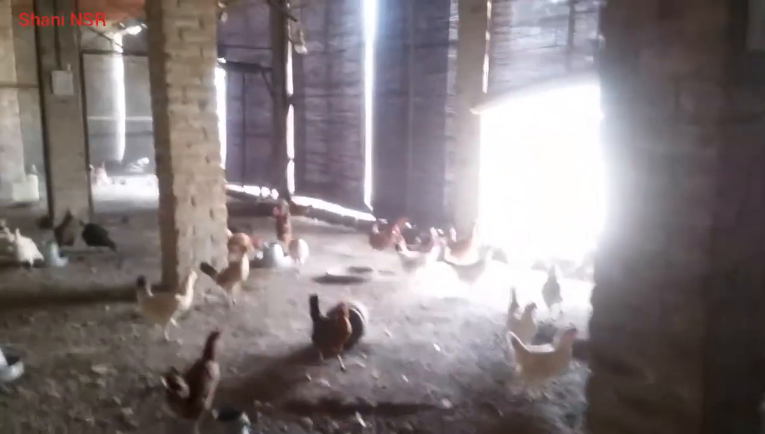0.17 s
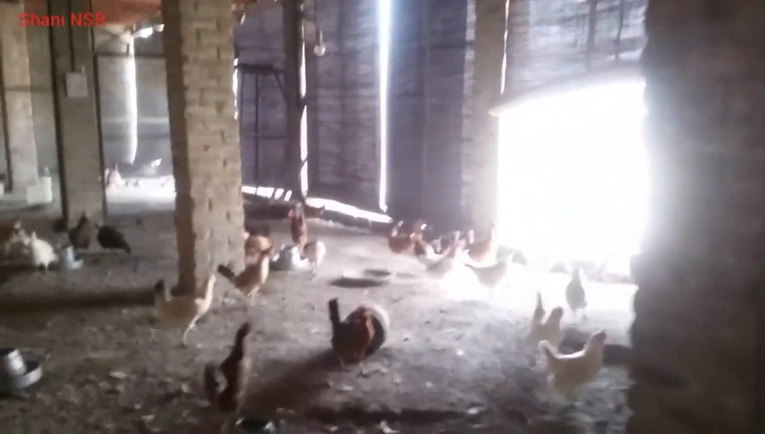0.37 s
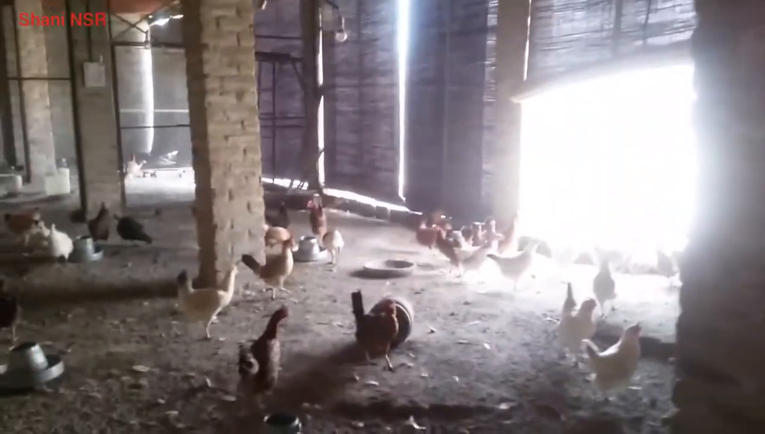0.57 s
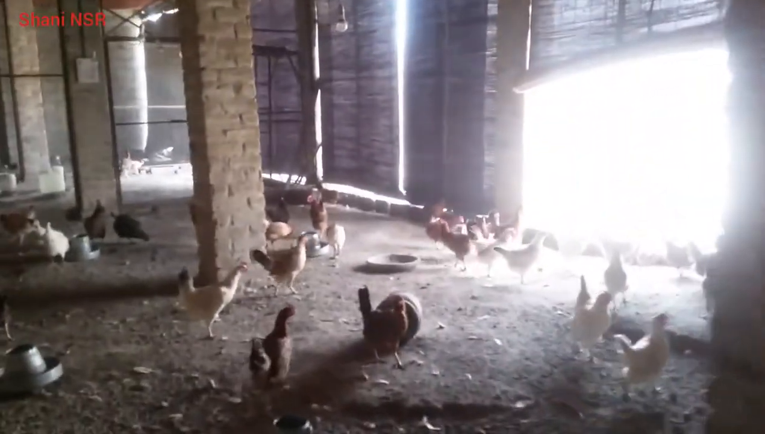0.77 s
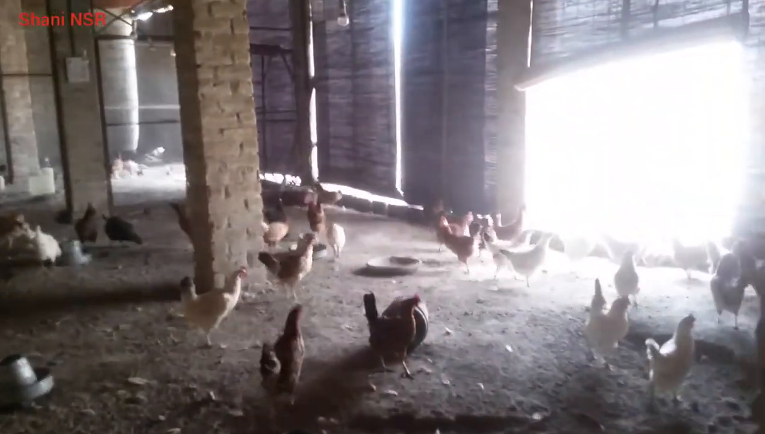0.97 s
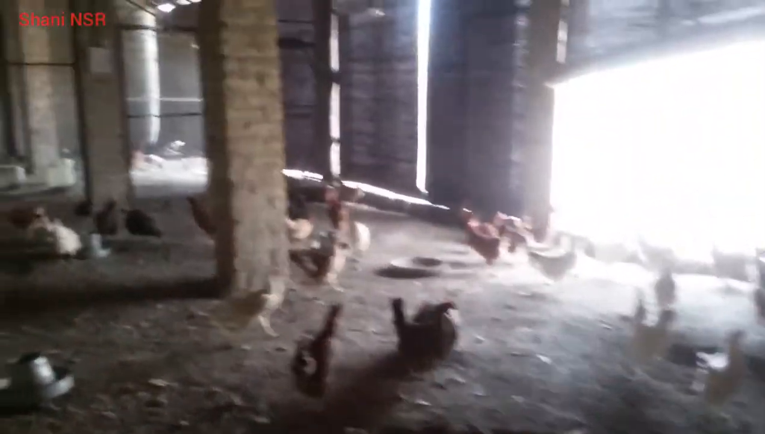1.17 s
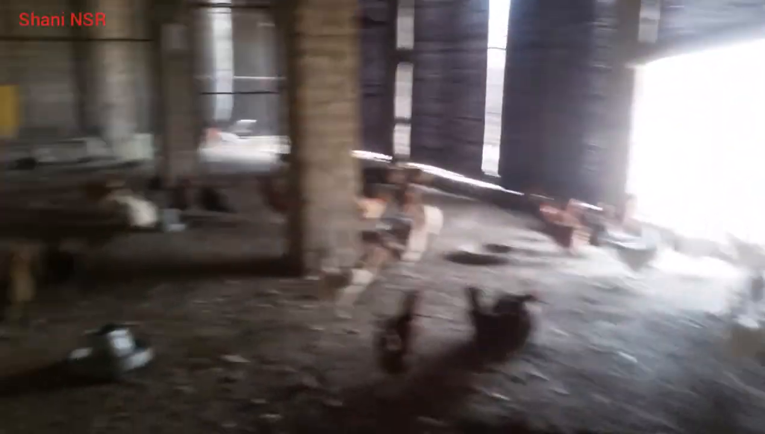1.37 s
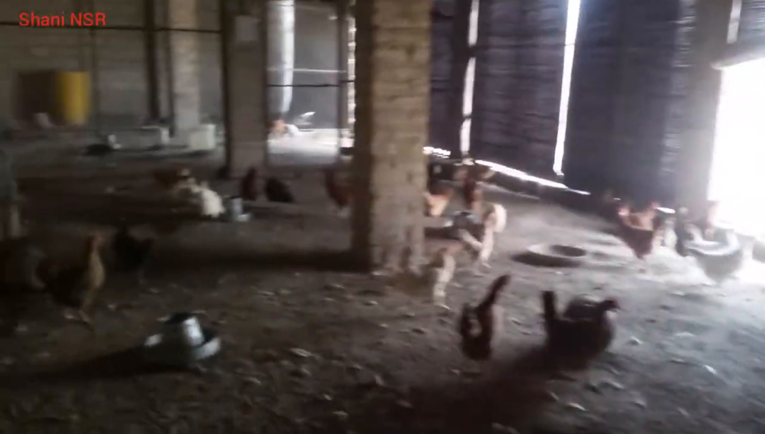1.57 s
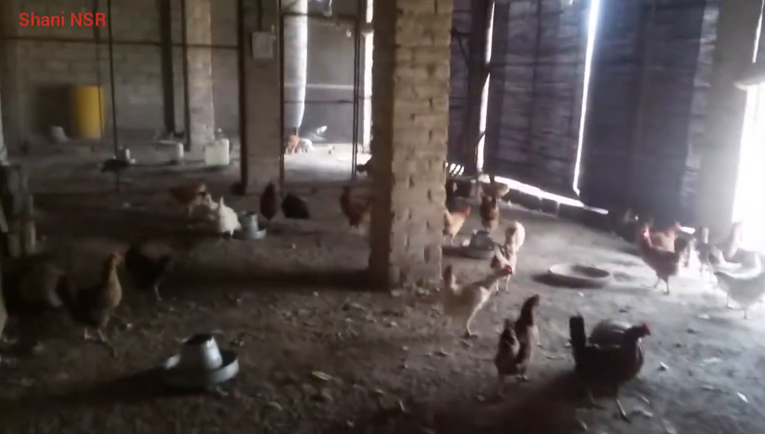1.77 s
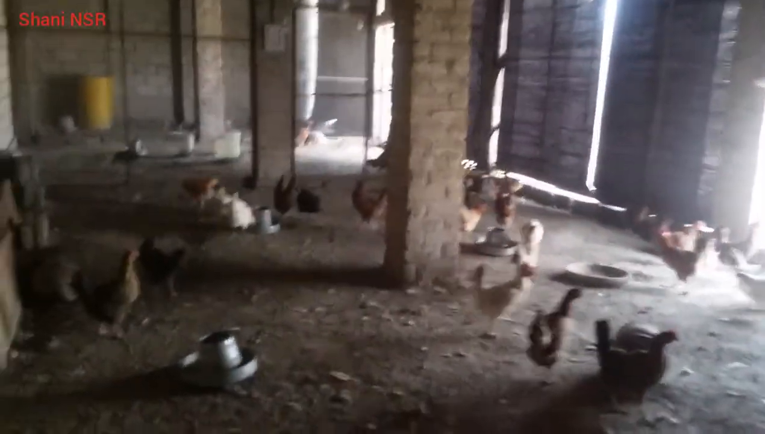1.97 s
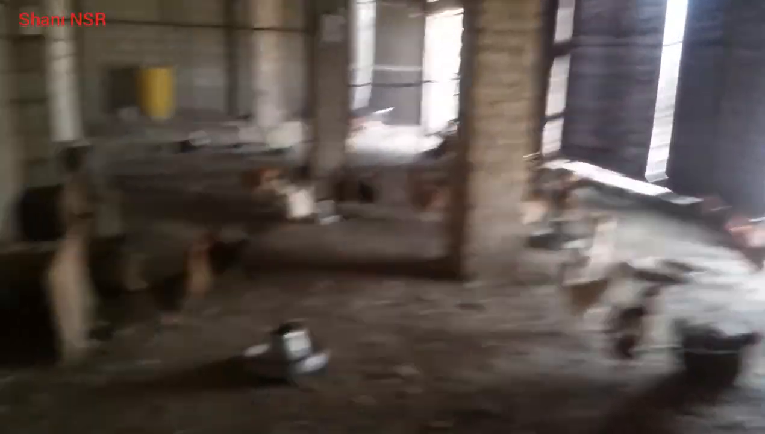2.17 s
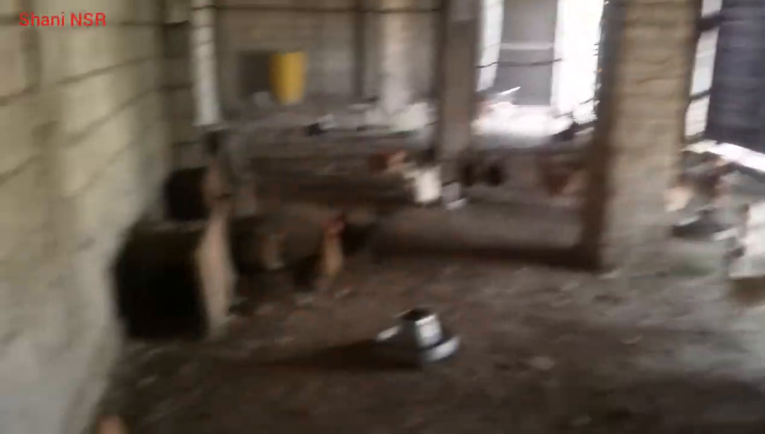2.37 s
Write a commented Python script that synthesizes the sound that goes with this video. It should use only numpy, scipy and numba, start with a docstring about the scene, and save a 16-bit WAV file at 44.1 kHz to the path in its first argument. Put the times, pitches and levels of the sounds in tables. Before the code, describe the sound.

Hens give a bunch of short clucks over drawn-out moans in a ringing brick shed. Faint scratching, pecking and distant cheeping follow, then a near bird squawks hoarsely twice while soft knocks bump the microphone.

```python
"""Hens in a brick poultry shed, over low noise and a faint hum. First a bunch of short clucks sounds
over the drawn-out moans of others, each voice a shaking syrinx filtered by the throat. From 0.9 s feet
scratch, beaks peck and the far flock's cheeping swells. At 2 s a near bird lets out two loud, hoarse
squawks, while soft knocks bump the right microphone. The shed rings after every call."""
import sys
import numpy as np
from scipy import signal
from scipy.fft import rfft, irfft, next_fast_len
from scipy.io import wavfile
from numba import njit

SR = 44100
rng = np.random.default_rng(int(sys.argv[2]) if len(sys.argv) > 2 else 0)


def bounce(signal):
    """Save signal as a 16-bit WAV file at the path given by the first command-line argument."""
    frames = np.transpose(np.atleast_2d(signal))
    limited = np.clip(frames, -1, 1)
    pcm = np.round(limited * 32767).astype(np.int16)
    wavfile.write(sys.argv[1], SR, pcm)


N = 107207
T = np.arange(N) / SR


def undb(db):
    """Decibels to gain."""
    return 10 ** (np.asarray(db) / 20)


def unit(x):
    """Scale to rms 1."""
    return x / np.sqrt(np.mean(x ** 2) + 1e-18)


def gain_at(hz, colour):
    """Gain of an (f/Hz, level/dB) table at any frequency."""
    f, db = np.array(colour).T
    return undb(np.interp(np.log(np.maximum(hz, 1)), np.log(f), db))


def shape(x, response):
    """Filter by a gain that is a function of frequency."""
    size = next_fast_len(N + N // 4, real=True)
    hz = np.arange(size // 2 + 1) * SR / size
    return irfft(rfft(x, size) * response(hz), size)[..., :N]


def noise(colour):
    """Coloured noise, rms 1."""
    return unit(shape(rng.standard_normal(N), lambda f: gain_at(f, colour)))


def wobble(rate_hz):
    """Smooth random drift, rms 1."""
    return unit(shape(rng.standard_normal(N), lambda f: np.exp(-.5 * (f / rate_hz) ** 2)))


def curves(table):
    """Columns of a control table, interpolated over time."""
    times, *columns = np.array(table).T
    return [np.interp(T, times, column) for column in columns]


def gate(start, end, edge_s):
    """On between two times, with soft edges."""
    return np.clip((T - start) / edge_s + .5, 0, 1) * np.clip((end - T) / edge_s + .5, 0, 1)


def pan(x, db):
    """Place a sound by its left-minus-right level."""
    return x * undb(np.array([[db], [-db]]) / 2)


@njit
def resonate(x, hz, width_hz):
    """Band-pass with a moving centre, gain 1 there."""
    y, band_state, low_state = np.empty(len(x)), 0., 0.
    for i in range(len(x)):
        g, damping = np.tan(np.pi * hz[i] / SR), width_hz / hz[i]
        band = (band_state + g * (x[i] - low_state)) / (1 + g * (g + damping))
        band_state = 2 * band - band_state
        low_state += 2 * g * band
        y[i] = damping * band
    return y


# Left-right likeness of the ring: f/Hz, correlation
RING_CORRELATION = [(300, 0.46), (750, 0.4), (1200, 0.23), (1900, 0.68), (6000, .1)]

def shed(x, low_t60_s=0.62, treble_t60_s=0.38, split_hz=2500, first_echo_s=0.0049, build_s=0.0043):
    """Diffuse ring of the brick walls, shorter in the treble."""
    white = rng.standard_normal((2, N))
    low = shape(white, lambda f: 1 / (1 + (f / split_hz) ** 2))
    tail = low * undb(-60 * T / low_t60_s) + (white - low) * undb(-60 * T / treble_t60_s)
    onset = np.clip((T - first_echo_s) / build_s, 0, 1)
    mid, side = unit(tail * onset) / np.sqrt(N)
    alike = lambda f: np.interp(f, *np.array(RING_CORRELATION).T)
    mid = shape(mid, lambda f: np.sqrt((1 + alike(f)) / 2))
    side = shape(side, lambda f: np.sqrt((1 - alike(f)) / 2))
    return np.array([signal.fftconvolve(x, mid + sign * side)[:N] for sign in (1, -1)])


# Background spectrum: f/Hz, relative level/dB
AIR_COLOUR = [(20, -19), (40, -4.5), (65, 3), (100, -4.5), (200, 0), (330, -7), (650, -14), (870, -10.5),
              (1050, -17), (1700, -17), (3000, -29.5), (5000, -46.5), (8500, -69.5), (11000, -46.5),
              (13000, -34.5), (15500, -29.5)]
# Hum lines: f/Hz, level/dB
HUM_LINES = [(120, -66), (528, -61.5)]

def background(air_db=-50, side_db=-12.5):
    """Low steady noise, thin hiss and a faint hum."""
    air = noise(AIR_COLOUR) + undb(side_db) * noise(AIR_COLOUR) * np.array([[1], [-1]])
    hum = sum(undb(db) * np.sqrt(2) * np.sin(2 * np.pi * hz * T) for hz, db in HUM_LINES)
    return pan(undb(air_db) * air + hum, db=0.5)


# Microphone bumps: t/s, relative level/dB
KNOCKS = [(2.155, -29.5), (2.176, -26.5), (2.203, -31), (2.27, -28.5)]
# Bump filter: f/Hz, gain/dB
KNOCK_COLOUR = [(50, -37), (110, -6), (180, -4), (330, -2.5), (600, 7), (1500, -21)]

def knocks(hz=270, decay_s=0.0018):
    """Dull bumps, each a single push on the right microphone."""
    pushes = 0
    for start, db in KNOCKS:
        age = np.maximum(T - start, 0)
        pushes += undb(db) * np.exp(-age / decay_s) * np.sin(2 * np.pi * hz * age)
    bumps = undb(5.5) * shape(pushes, lambda f: gain_at(f, KNOCK_COLOUR))
    return pan(bumps, db=-16)


# Far flock's swell: t/s, relative level/dB
FLOCK_SWELL = [(0, -62), (.5, -59), (.68, -50), (.85, -58), (.92, -45.5), (1.12, -52.5), (1.22, -45),
               (1.39, -57), (1.46, -49.5), (1.77, -50), (1.9, -50.5), (2.43, -45.5)]
# Rustle spectrum: f/Hz, relative level/dB
RUSTLE_COLOUR = [(800, -24), (1700, -18), (2300, 9.5), (2900, 0.5), (3400, -5.5), (4000, -6.5),
                 (5000, -24.5), (7000, -38)]

def flock(count=120, centre_hz=3010, spread=0.16, width_s=0.0087):
    """Many far birds: short cheeps blurred into a rustle."""
    cheeps = np.zeros(N)
    for when, pitch, strength in rng.random((count, 3)):
        age = T - when * T[-1]
        hz = centre_hz * (1 + spread * (2 * pitch - 1))
        envelope = strength * np.exp(-(age / width_s) ** 2)
        cheeps += envelope * np.sin(2 * np.pi * hz * (age - age ** 2))
    rustle = np.array([noise(RUSTLE_COLOUR) * undb(1.7 * wobble(rate_hz=30)) for _ in range(2)])
    swell = undb(curves(FLOCK_SWELL)[0] - 7)
    return swell * (rustle + undb(-4.5) * unit(shed(cheeps)))


# Far whistles: t/s, length/s, start f/Hz, end f/Hz, level/dB
PEEPS = [(1.166, .08, 3200, 3500, -54.5), (1.274, 0.045, 3435, 3270, -60.5),
         (1.42, 0.081, 3230, 3336, -57.5), (1.51, 0.087, 3250, 3740, -59.5),
         (1.79, 0.091, 3485, 3310, -61.5)]

def peeps(quaver=0.04, direct_db=-8):
    """Thin sliding whistles of far birds, heard mostly through the shed."""
    shake = 1 + quaver * wobble(rate_hz=70)
    whistles = 0
    for start, length, start_hz, end_hz, db in PEEPS:
        hz = np.interp(T, [start, start + length], [start_hz, end_hz]) * shake
        phase = 2 * np.pi * np.cumsum(hz) / SR
        whistles += undb(db) * gate(start, start + length, edge_s=0.02) * np.sin(phase)
    return undb(direct_db) * whistles + shed(whistles)


# Foot strokes: t/s, length/s, level/dB
SCRATCHES = [(0.899, 0.045, -62), (1.6, 0.14, -59.5)]
# Litter spectrum: f/Hz, relative level/dB
LITTER_COLOUR = [(600, -11.5), (1500, -2.5), (2400, 2.5), (3400, -8.5), (4300, -7.5), (5200, -22),
                 (6500, -29.5), (8500, -47)]

def scratches(grain_db=7.5):
    """Feet rake the dry litter in short grainy strokes."""
    strokes = sum(undb(db) * gate(t, t + length, edge_s=0.032) for t, length, db in SCRATCHES)
    return strokes * unit(noise(LITTER_COLOUR) * undb(grain_db * wobble(rate_hz=170)))


# Beak taps: t/s, relative level/dB, resonance f/Hz
PECKS = [(.899, -26.5, 1370), (1.09, -28, 1300), (1.641, -30, 1696), (1.75, -36.5, 2880)]
# Tap filter: f/Hz, gain/dB
PECK_COLOUR = [(100, -8), (500, -3), (4000, -18), (7000, -45.5), (16000, -56.5)]

def pecks(decay_s=0.0011, half_width_hz=810):
    """Taps on the earth floor that die at once, each with its own dull resonance."""
    taps = 0
    for start, db, hz in PECKS:
        burst = rng.standard_normal(N) * undb(db) * (T >= start) * np.exp(-abs(T - start) / decay_s)
        resonance = lambda f: undb(7) / (1 + ((f - hz) / half_width_hz) ** 4)
        taps += shape(burst, lambda f: gain_at(f, PECK_COLOUR) + resonance(f))
    return taps


def voice(hz, gain, rough, throat, clear_hz=SR, jitter=0.035, breakup=0.81):
    """A shaking syrinx heard through the throat; roughness adds half-pitch lines and pulsed hiss."""
    on = gain > 1e-5
    pitch = (hz * (1 + jitter * rough * wobble(rate_hz=59.2)))[on]
    phase = 2 * np.pi * np.cumsum(pitch) / SR
    half_gain = (rough * undb(-2.5) * (1 + 0.17 * wobble(rate_hz=190)))[on]
    # above clear_hz the harmonics break up into hiss
    broken = lambda f: breakup * (1 - 1 / (1 + (f / clear_hz) ** 20))
    tone, power, sound = 0, 0, np.zeros(N)
    for k, offset in enumerate(rng.uniform(0, 2 * np.pi, size=40), 1):
        line_hz = pitch * k / 2
        line_gain = throat(line_hz) * np.sqrt(1 - broken(line_hz)) * (line_hz < 0.45 * SR)
        if k % 2:
            line_gain *= half_gain
        else:
            power += line_gain ** 2 / 2
        tone += line_gain * np.sin(k * phase / 2 + offset)
    sound[on] = tone / np.sqrt(power)
    puffs = rng.standard_normal(N)
    puffs[on] *= 1 + np.cos(phase)
    hiss = unit(shape(puffs, lambda f: throat(f) * f ** 2 / (f ** 2 + 200 ** 2)))
    sound += rough * undb(-3.5) * hiss
    if clear_hz < SR:
        sound += undb(-5) * shape(hiss, lambda f: np.sqrt(broken(f)))
    return sound * gain * undb(3.4 * rough * wobble(rate_hz=69))


# Croon contour: t/s, f/Hz, level/dB
CROON = [(0.25, 335, -58.5), (0.618, 339.3, -50.5), (0.798, 368.3, -50), (0.883, 375.6, -46),
         (0.911, 430, -49), (1.002, 444.1, -49.5), (1.05, 409, -66), (1.113, 398, -45), (1.19, 398.6, -51),
         (1.268, 399, -49.5), (1.346, 414.3, -47.5), (1.37, 382, -69)]
# Throat filter: f/Hz, gain/dB
CROON_THROAT = [(200, -23), (400, 12.5), (800, -24), (1200, -17.5), (2000, -9), (5000, -48)]

def croon(quaver=0.018):
    """One hen holds a soft, wavering note."""
    hz, db = curves(CROON)
    hz *= 1 + quaver * wobble(rate_hz=33)
    gain = undb(db) * gate(CROON[0][0], CROON[-1][0], edge_s=0.019)
    return voice(hz, gain, rough=0.65, throat=lambda f: gain_at(f, CROON_THROAT))


# Moans: t/s, length/s, start f/Hz, end f/Hz, level/dB, throat resonance f/Hz, roughness/0-1
MOANS = [(0.029, 0.047, 351.5, 356, -51, 1000, 0.6), (0.079, 0.13, 430, 441, -51, 1280, 0.5),
         (0.188, 0.14, 406, 420, -52, 801, 1), (0.275, 0.35, 328.7, 357.5, -45.5, 1022, 0.5),
         (0.426, 0.056, 402.3, 396.6, -43.5, 830, 0.1), (0.571, .14, 344, 342.4, -41.5, 973, 0.6),
         (0.732, 0.12, 354, 360.7, -43.5, 1015, 0.59), (0.887, 0.022, 296.7, 294, -39.5, 595, 0.4),
         (0.908, 0.094, 395, 398.3, -38.5, 870, 0.24), (1.019, 0.049, 397.2, 392.7, -36.5, 867, 0.15),
         (1.057, 0.06, 373, 366.7, -40.5, 1010, 0.6), (1.262, 0.044, 398.5, 396, -50, 1270, 0.35),
         (1.795, 0.08, 430, 441, -62.5, 878, 0.7)]
# Throat filter under the resonance: f/Hz, gain/dB
MOAN_THROAT = [(200, -24), (450, -38.5), (1250, -23), (1650, -11.5), (1900, -25), (2300, -34),
               (4000, -45.5), (7000, -65.5)]

def moans(quaver=0.018, throb_db=2.5, width_hz=184):
    """Low quavering notes; one throat resonance picks out a harmonic."""
    notes = 0
    for start, length, start_hz, end_hz, db, throat_hz, rough in MOANS:
        throat = lambda f: gain_at(f, MOAN_THROAT) + 1 / (1 + ((f - throat_hz) / width_hz) ** 2) ** 2
        hz = np.interp(T, [start, start + length], [start_hz, end_hz])
        hz *= 1 + quaver * wobble(rate_hz=33.4)
        gain = undb(db + throb_db * wobble(rate_hz=11)) * gate(start, start + length, edge_s=0.019)
        notes += voice(hz, gain, rough, throat)
    return notes


# Clucks, the second heard as several quick pulses:
# peak t/s, rise/s, fall/s, f/Hz, level/dB, pan/dB, roughness/0-1
CLUCKS = [(.16, 0.012, 0.018, 588.7, -28, 0.5, 0.12), (.322, 0.004, 0.015, 650.6, -25, -1.5, 0.19),
          (.338, 0.0032, .004, 646, -26, -4, 0.2), (.351, .004, .007, 640, -28, -0.5, 0.08),
          (.377, 0.0065, 0.007, 651, -35, 0, 0), (.482, .012, 0.008, 749, -23.5, -1, 0.07),
          (.555, 0.0092, 0.008, 746, -23, -2, 0.04), (.658, 0.019, 0.008, 740.4, -27.5, -0.5, 0.1)]
# Throat filter: f/Hz, gain/dB
CLUCK_THROAT = [(400, -18), (600, -7.5), (760, -4), (1170, 3), (1480, 12), (1620, -7.5), (1760, -10),
                (1920, -6.5), (2150, -22.5), (3000, -38), (4400, -48), (7000, -70.5)]

def clucks(arch=0.033, quaver=0.023):
    """Short notes whose pitch arches with their strength."""
    notes = 0
    for peak, rise, fall, hz, db, pan_db, rough in CLUCKS:
        swell = np.exp(-((T - peak) / np.where(T < peak, rise, fall)) ** 2)
        bend = 1 - arch * (1 - swell) + quaver * wobble(rate_hz=36)
        note = voice(hz * bend, undb(db) * swell, rough, lambda f: gain_at(f, CLUCK_THROAT))
        notes += pan(note, pan_db)
    return notes


# Squawk contours: t/s, f/Hz, relative level/dB, roughness/0-1, beak resonance f/Hz, treble/dB
FIRST_SQUAWK = [(1.985, 660, -45, 0.07, 1970, -18.5), (1.995, 659.6, -13, 0.25, 1986, -22),
                (2.002, 674, -20.5, 0.3, 1890, -19), (2.007, 696.5, -15.5, 0.2, 1420, -17),
                (2.02, 708.5, -13, 0.2, 1495, -14), (2.03, 736, -23.5, 0.19, 1300, -5.5),
                (2.055, 760, -16.5, 0.3, 1418, -8), (2.075, 781.9, -16.5, 0.48, 1564, -2.5),
                (2.095, 757.3, -17.5, 0.74, 1240, -13), (2.11, 688.4, -16, 0.7, 1313, -5),
                (2.126, 675, -13, 0.38, 1353, -11), (2.14, 673.5, -30.5, 0.4, 1320, 9),
                (2.17, 652, -31.5, 0.8, 699, 5), (2.2, 670, -49, 0.7, 751, 2)]
SECOND_SQUAWK = [(2.28, 535.4, -58, 0.43, 1060, -14), (2.3, 603.8, -19, 0.33, 1044, -16.5),
                 (2.315, 645, -16, 0.92, 1920, -8), (2.328, 805, -14.5, 0.4, 1880, -8.5),
                 (2.342, 803, -15.5, 0.24, 1940, 6.5), (2.375, 811.6, -22, 0.21, 1550, 11.5),
                 (2.41, 794, -21, 0.36, 1452, -7), (2.44, 802, -33.5, 0.36, 1530, -12)]
# Throat filters, beak wider in the second: f/Hz, gain/dB
FIRST_THROAT = [(300, -38.5), (460, -5.5), (600, -1), (740, -1.5), (900, -3.5), (1050, -1), (1170, -7.5),
                (1380, 3.5), (1550, -13.5), (1720, -7.5), (1980, -7), (2400, -27), (2650, -28.5),
                (2870, -13.5), (3100, -23.5), (3500, -31), (4100, -25.5), (5000, -33.5), (6800, -41.5),
                (8000, -62.5), (9600, -48.5), (13500, -44.5), (16000, -55)]
SECOND_THROAT = [(300, -32), (460, -22.5), (600, 2.5), (790, 3), (910, 2), (1060, 5.5), (1180, -5),
                 (1570, 0.5), (1760, -5), (1960, 2), (2400, -17.5), (2850, -15), (3200, -23), (4050, -22),
                 (4850, -17.5), (5600, -44), (6500, -41.5), (8500, -68.5), (10300, -46.5), (12000, -62),
                 (14300, -39), (16000, -75)]

def squawk(contour, throat, clear_hz, beak_db=9.5, treble_hz=3600):
    """A loud cry that rises in pitch and breaks up; the beak sweeps a resonance and lets out treble."""
    hz, db, rough, beak_hz, treble_db = curves(contour)
    gain = undb(db) * gate(contour[0][0], contour[-1][0], edge_s=0.004027)
    cry = voice(hz, gain, rough, lambda f: gain_at(f, throat), clear_hz)
    beak = resonate(cry, beak_hz, width_hz=240.)
    cry = (cry + (undb(beak_db) - 1) * beak) / undb(beak_db / 2)
    treble = shape(cry, lambda f: 1 - 1 / (1 + (f / treble_hz) ** 10))
    return pan(cry + (undb(treble_db) - 1) * treble, db=4)


def scene():
    """Every bird is heard directly and through the shed."""
    squawks = squawk(FIRST_SQUAWK, FIRST_THROAT, clear_hz=3530)
    squawks += squawk(SECOND_SQUAWK, SECOND_THROAT, clear_hz=15140)
    clucking = clucks()
    murmur = pan(moans() + croon(), db=3.5) + pecks() + scratches()
    send = undb(-7) * murmur + undb(-9) * clucking + undb(-1) * squawks
    hens = murmur + clucking + squawks + shed(send.mean(axis=0))
    return background() + knocks() + flock() + peeps() + undb(-0.14) * hens


# Microphone balance: f/Hz, left minus right/dB
MIC_BALANCE = [(100, -1.5), (300, -3), (700, -3), (1400, -3), (2700, -7.5), (4500, -4.5), (8000, -4),
               (14000, 10.5)]
# Right microphone's lead: f/Hz, phase/rad
MIC_PHASE = [(60, 0), (400, -.3), (750, 0), (1100, .5), (1400, 2.1), (1900, 1.8), (3000, 1.2), (6000, .8)]

def record(dry):
    """Two microphones that differ in colour and phase; the top is cut."""
    hz, lead_rad = np.array(MIC_PHASE).T
    heard = []
    for channel, sign in zip(dry, (1, -1)):
        balance = lambda f: gain_at(f, MIC_BALANCE) ** (sign / 2)
        rotation = lambda f: np.exp(-.5j * sign * np.interp(f, hz, lead_rad))
        heard.append(shape(channel, lambda f: balance(f) * rotation(f)))
    lowpass = signal.ellip(10, .2, 80, 15800, fs=SR, output="sos")
    return signal.sosfilt(lowpass, heard)


dry = scene()
out = record(dry)
bounce(out)
```